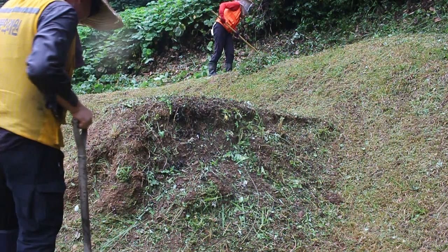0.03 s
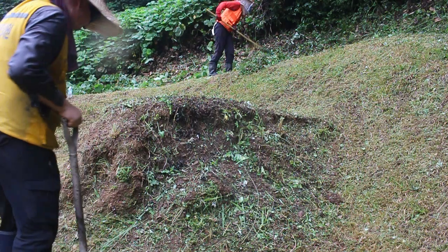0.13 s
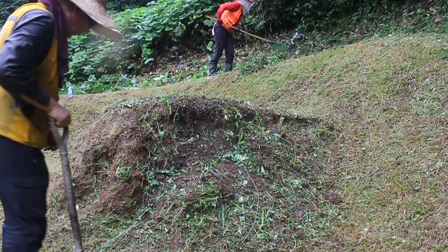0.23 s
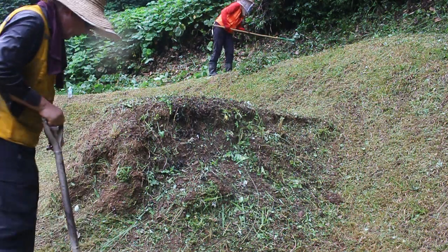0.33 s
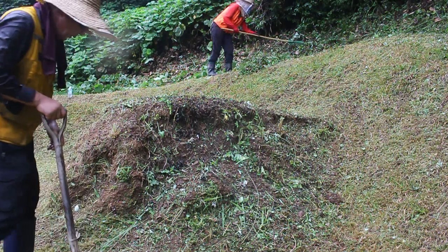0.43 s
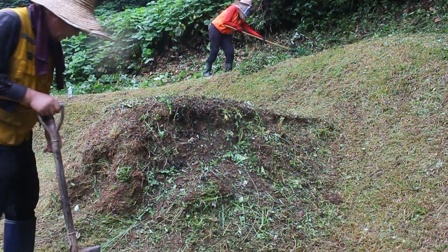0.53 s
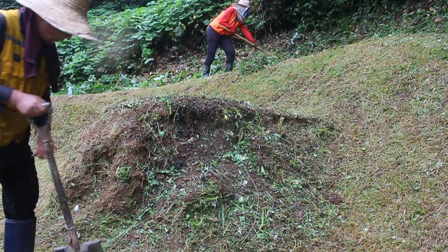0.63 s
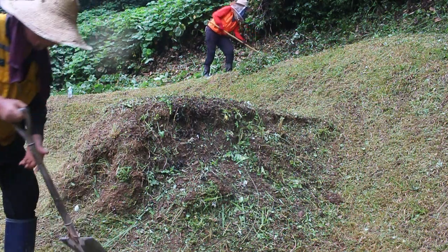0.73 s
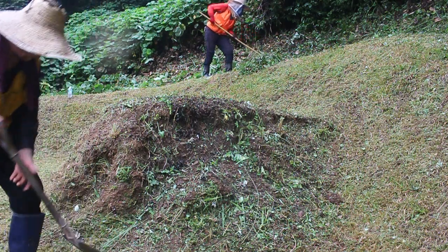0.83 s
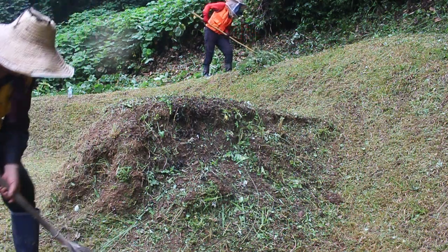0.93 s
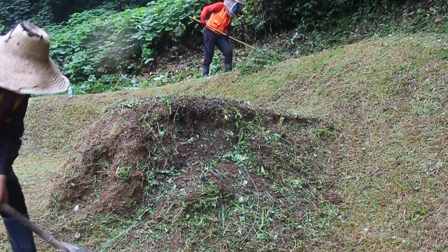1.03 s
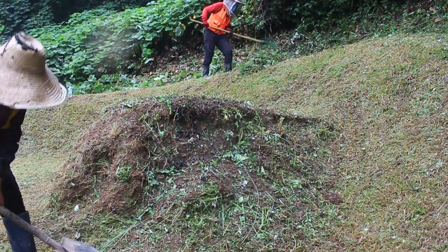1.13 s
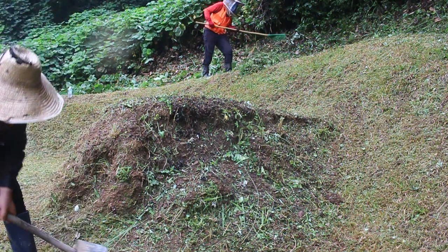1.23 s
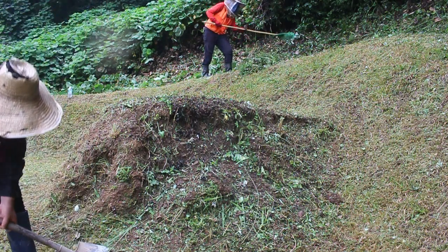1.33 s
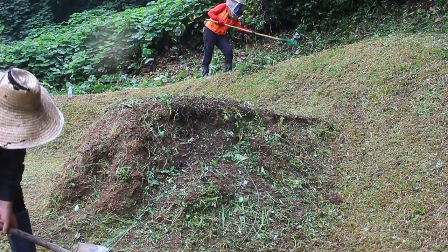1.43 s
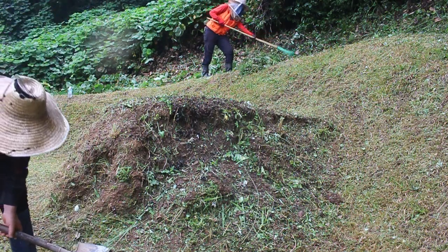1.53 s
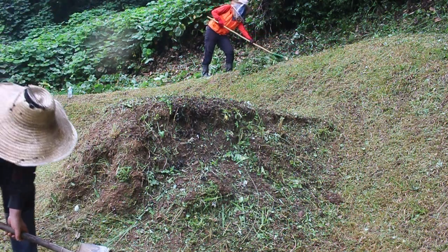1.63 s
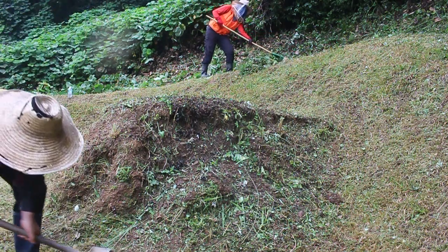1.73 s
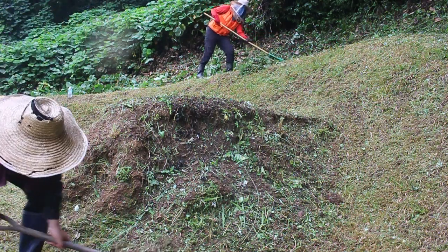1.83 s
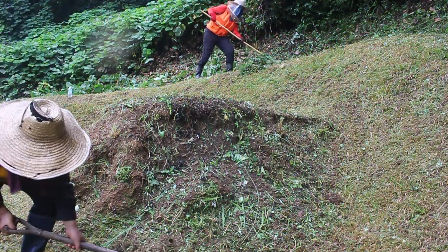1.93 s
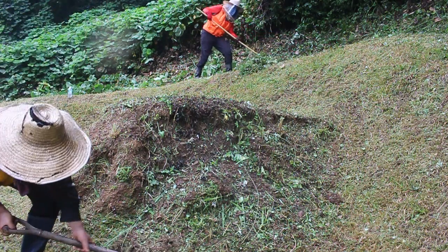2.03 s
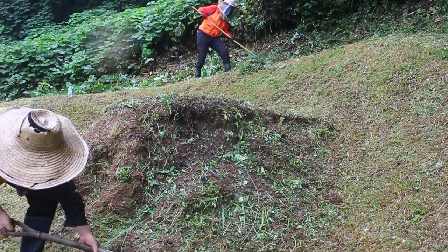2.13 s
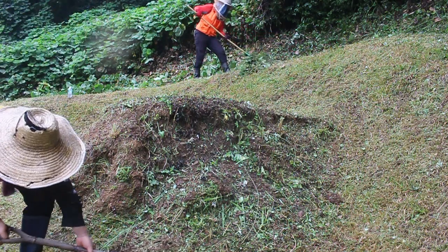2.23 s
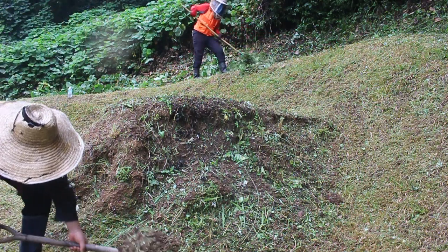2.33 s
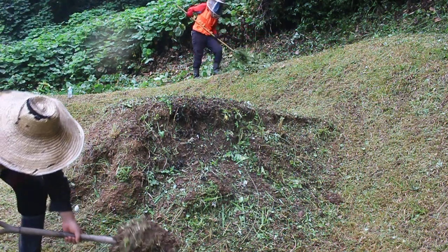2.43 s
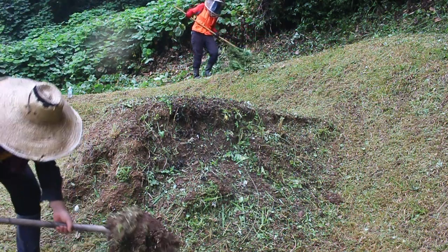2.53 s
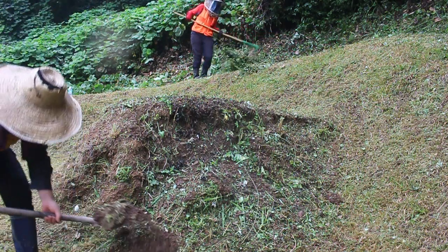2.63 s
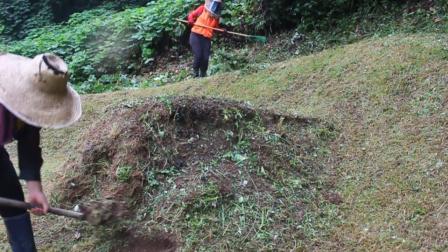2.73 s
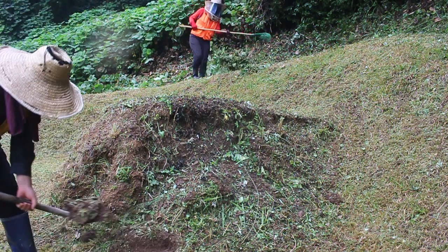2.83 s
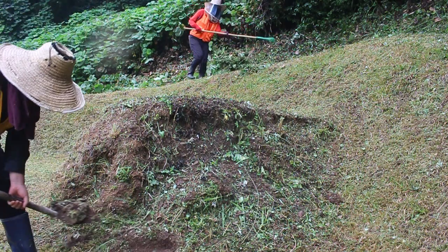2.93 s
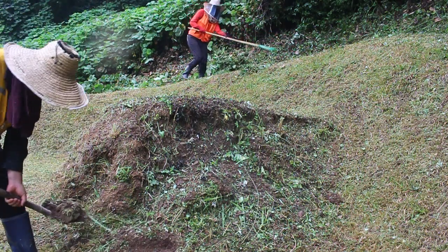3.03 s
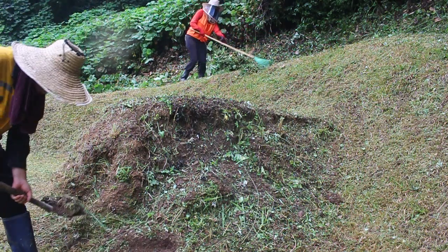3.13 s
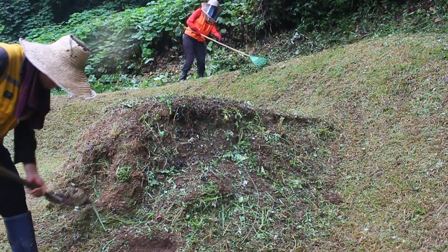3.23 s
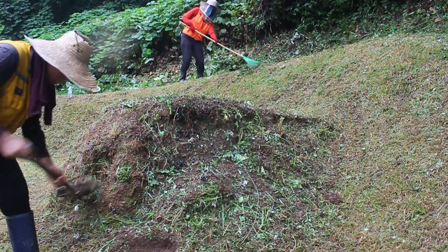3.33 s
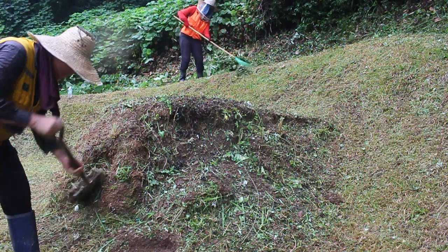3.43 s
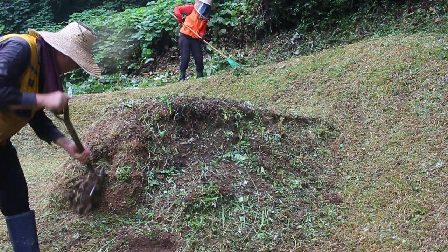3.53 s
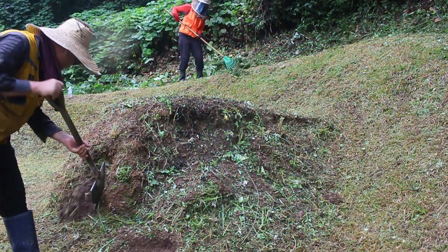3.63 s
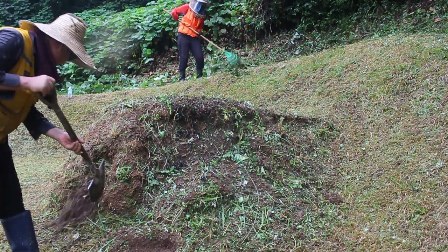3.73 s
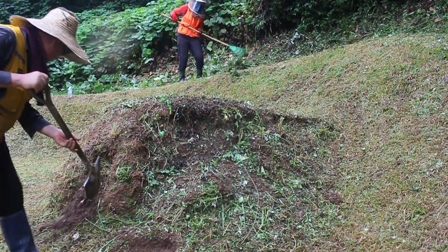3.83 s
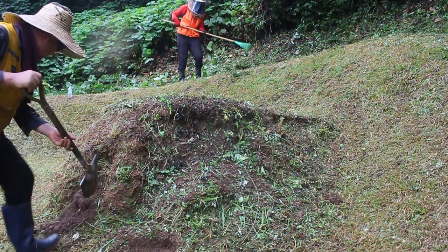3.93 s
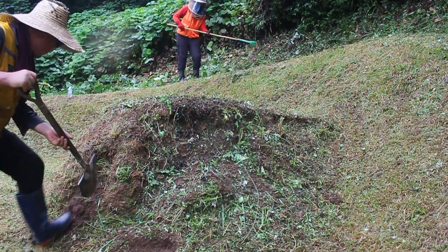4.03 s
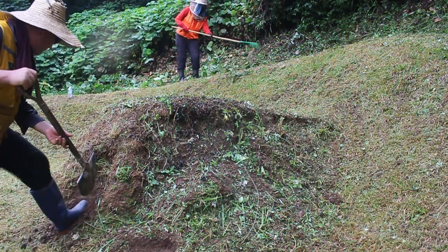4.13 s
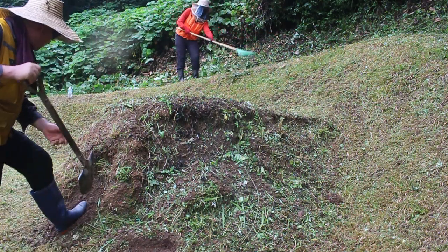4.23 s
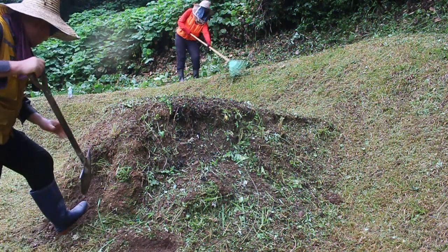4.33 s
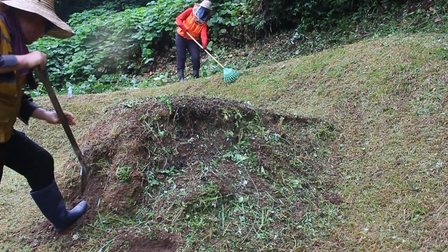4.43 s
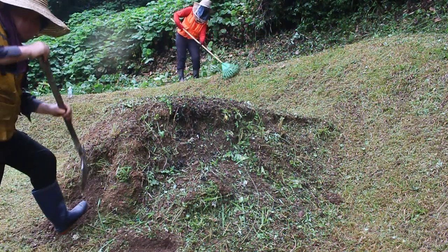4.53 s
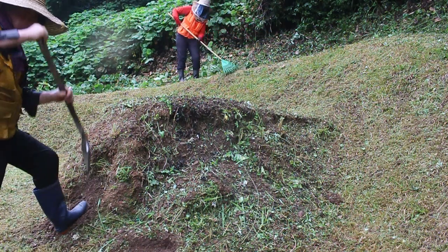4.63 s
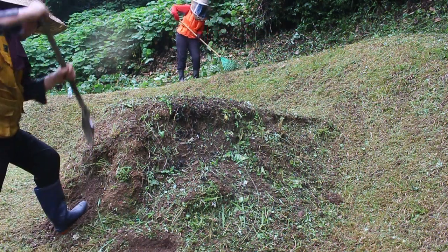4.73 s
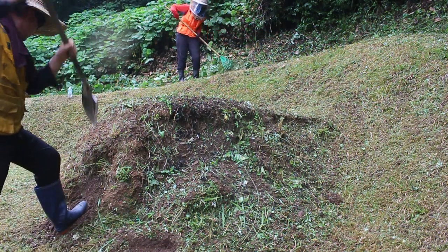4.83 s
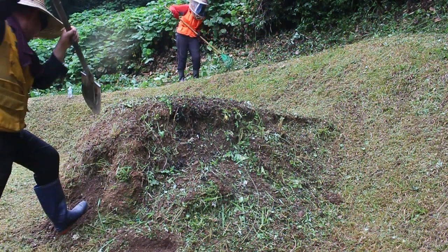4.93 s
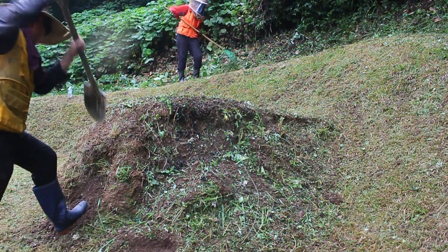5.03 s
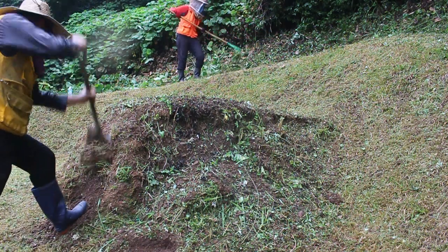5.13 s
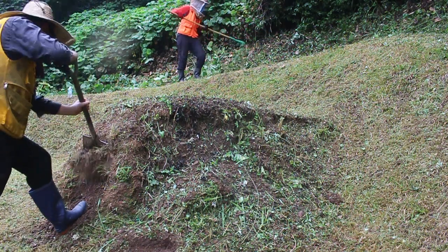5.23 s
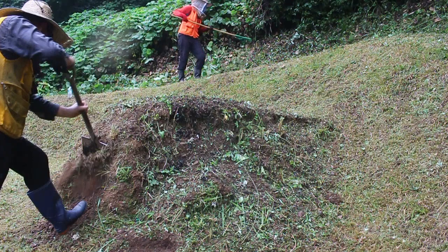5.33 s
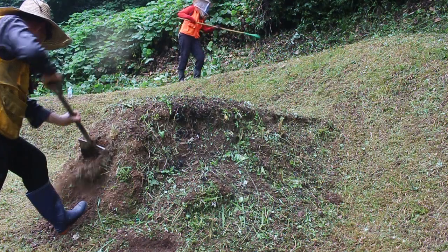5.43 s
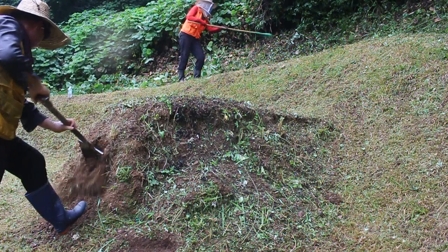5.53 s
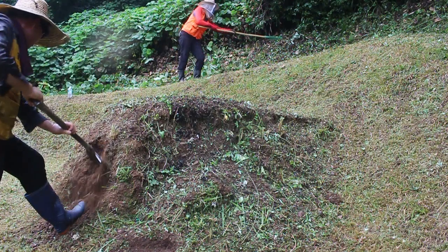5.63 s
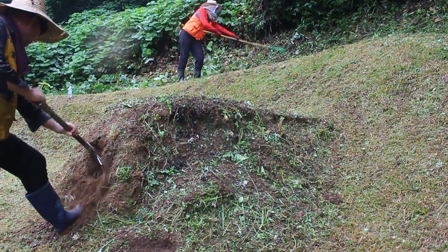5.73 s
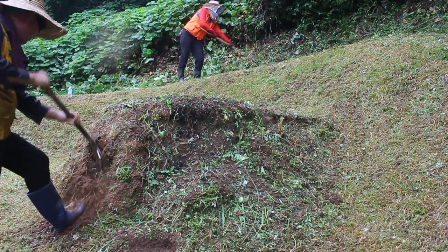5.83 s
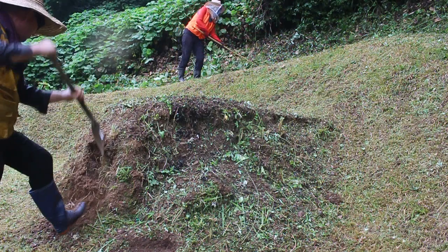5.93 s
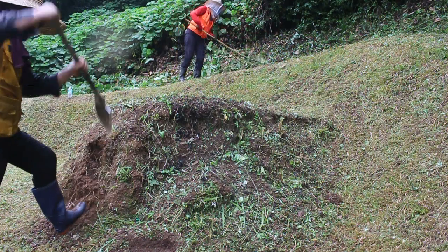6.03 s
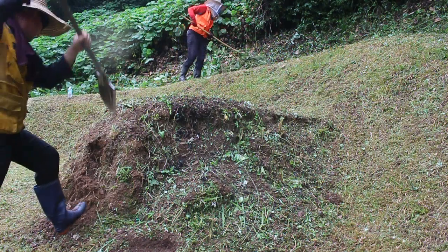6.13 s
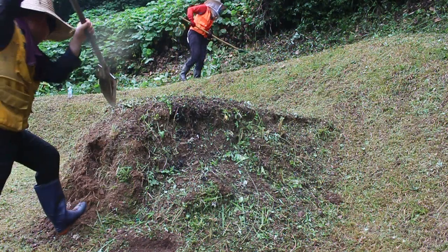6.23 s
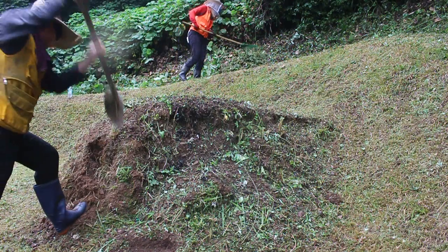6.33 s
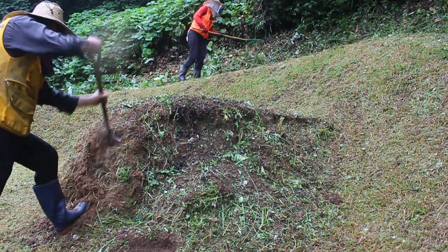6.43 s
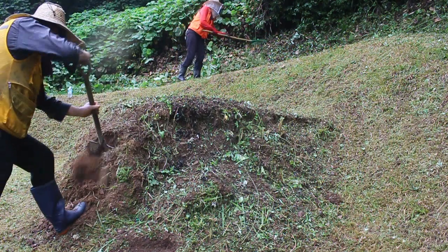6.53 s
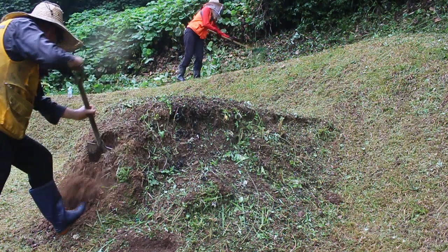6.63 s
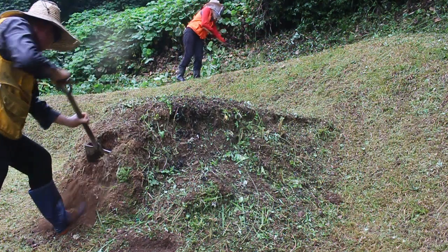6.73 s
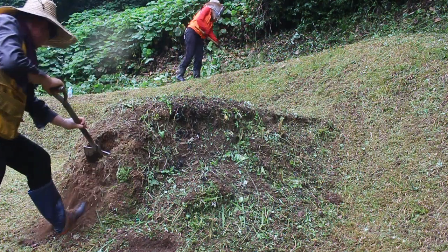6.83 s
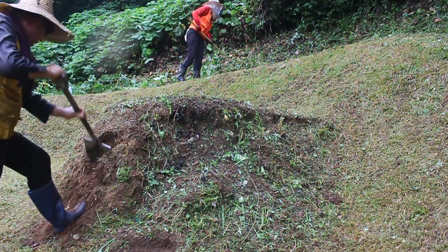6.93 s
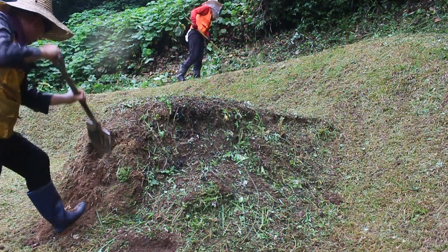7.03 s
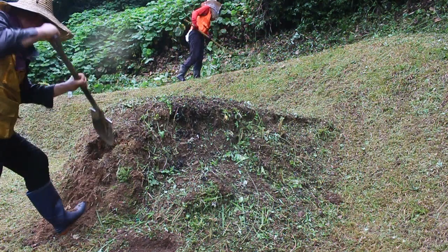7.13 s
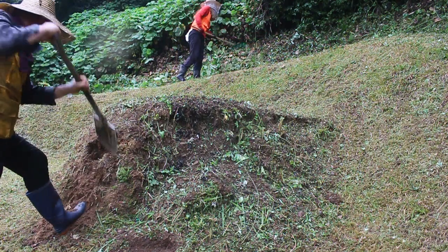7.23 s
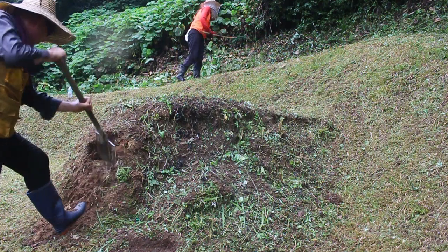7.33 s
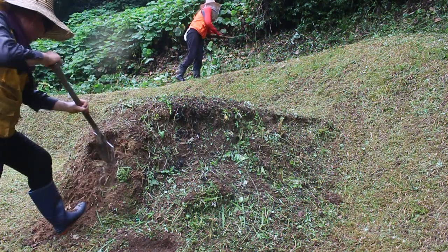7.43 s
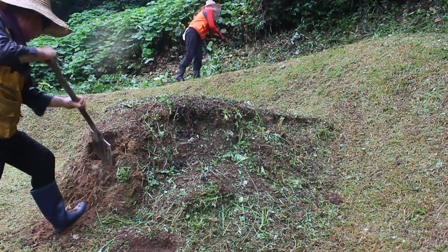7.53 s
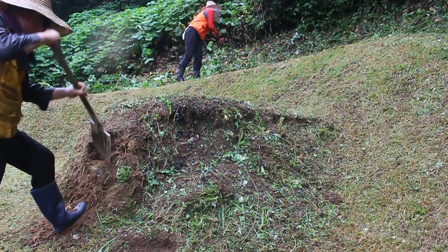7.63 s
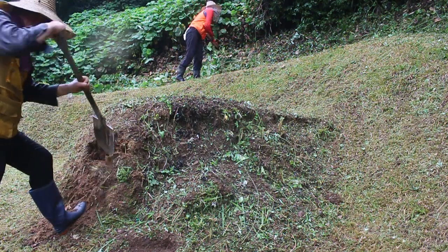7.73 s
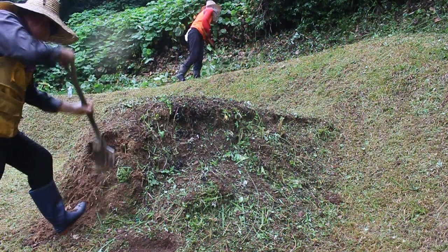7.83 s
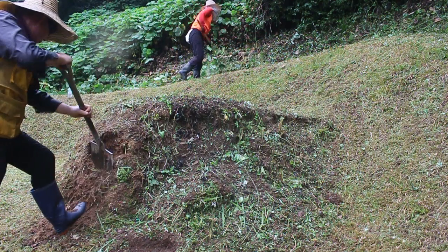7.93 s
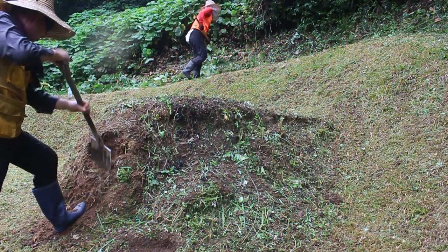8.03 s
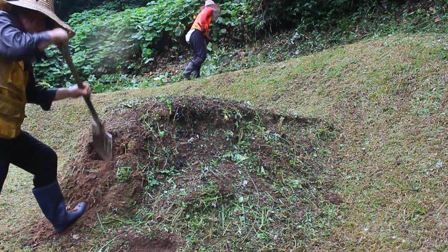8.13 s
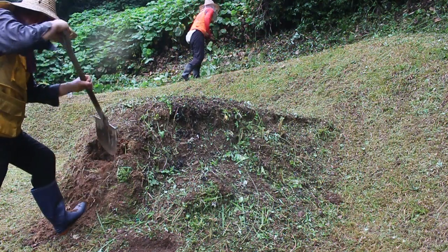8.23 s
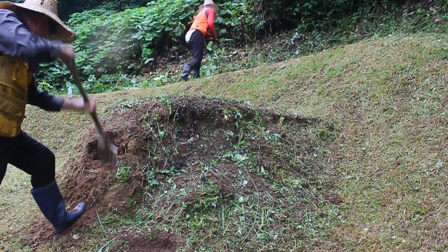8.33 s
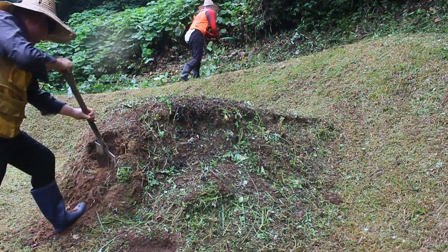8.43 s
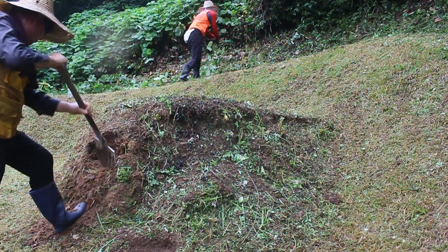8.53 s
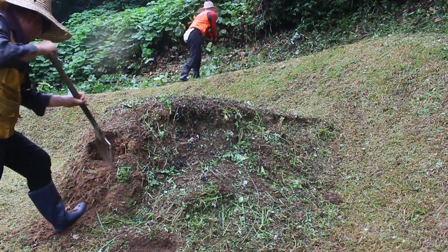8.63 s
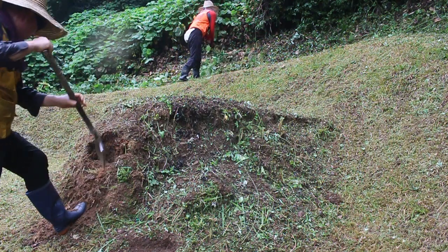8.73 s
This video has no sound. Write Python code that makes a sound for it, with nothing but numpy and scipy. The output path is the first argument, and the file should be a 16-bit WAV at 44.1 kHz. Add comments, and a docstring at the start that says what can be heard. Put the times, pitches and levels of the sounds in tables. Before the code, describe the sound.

Close crunching thrusts and rasps of a shovel in stony earth, with falling clods, one sharp knock and a soft cicada drone.

```python
"""On a grassy slope, a long-handled steel shovel works a heap of stony soil, close to one microphone.
Grit rasps along the blade while the soil muffles it; once free, the steel rings. Stones click, the
blade knocks hard on a buried one, clods thud down and loose earth patters on dry grass.
An insect flies by on humming wings, and cicadas drone in the trees behind, over a soft outdoor hush."""
import sys
import numpy as np
from scipy import signal
from scipy.fft import rfft, irfft
from scipy.io import wavfile
from scipy.ndimage import uniform_filter1d

SR = 44100
rng = np.random.default_rng(int(sys.argv[2]) if len(sys.argv) > 2 else 0)


def transcribe(signal):
    """Save signal, clipped to [-1, 1], as a 16-bit WAV file at the path in sys.argv[1]."""
    frames = np.atleast_2d(signal).T
    limited = np.clip(frames, -1, 1)
    pcm = np.round(limited * 32767).astype(np.int16)
    wavfile.write(sys.argv[1], SR, pcm)


N = 388080
TIME = np.arange(N) / SR

# The blade is jabbed in, bites and slides to a stop. Tilt brightens, body adds bass, f is a favoured pitch.
# t/s, level/dB, rise/s, slide/s, tilt/(dB per octave), body/dB, f/Hz
THRUSTS = [(.944, -34.5, 0.0026, 0.043, -1.5, -14, 3320), (3.453, -32, .005, 0.11, -2, 1, 1200),
           (3.540, -32.5, 0.0017, 0.04, -4.5, -17, 1600), (3.687, -33.5, 0.0044, 0.084, 2, -1, 3300),
           (4.461, -38.5, .0015, .05, 0, 4, 2150), (5.149, -11.5, 0.0023, 0.081, 0, -5, 2630),
           (5.851, -37.5, 0.0049, 0.11, 3, 10, 2750), (6.415, -13, 0.0089, .13, -.5, -3.5, 1140),
           (7.301, -32, 0.0076, 0.093, 6.5, 15, 3580)]
# The blade is drawn through soil: t/s, level/dB, rise/s, fall/s, tilt/(dB per octave), body/dB, f/Hz
DRAGS = [(1.06, -42.5, 0.061, 0.089, 2, 6, 1340), (1.216, -27.5, 0.058, 0.092, 1.5, 5.5, 1400),
         (1.685, -27, .15, 0.14, 1.1, 3, 1720), (3.45, -39, .15, .14, 2, -5, 1610),
         (5.58, -39.5, 0.049, 0.17, 2.5, 5, 2350), (6.418, -25, 0.029, 0.16, -0.5, -2, 1110),
         (7.699, -42.5, 0.04, 0.058, 2, -14, 2160), (7.845, -33.5, 0.052, 0.05, 2, -1, 1540),
         (8.091, -45, .028, .055, 5.5, -10, 2970), (8.347, -27, .064, 0.049, 2.5, -4, 3020),
         (8.699, -45, 0.053, .1, 1, -25, 2860)]
# The edge catches and grinds over a stone: t/s, level/dB, tilt/(dB per octave), body/dB, f/Hz
CATCHES = [(1.889, -23.5, -4.5, -4, 1760), (3.484, -33, 2, 8, 1230), (3.598, -28, 2, -10, 5170),
           (3.620, -27, 2.5, 8.5, 2950), (5.713, -32.5, 0.9, -1.5, 2300), (6.435, -17.5, -7, -7.5, 2280),
           (6.487, -12, -3, -4, 1150), (7.425, -30.5, -0.5, -1, 2460), (7.881, -28.5, 4.5, 3, 2530),
           (8.391, -23, 1, 1, 3140), (8.413, -18.5, -4.5, -2.5, 630)]
# The tone of grit on steel: f/Hz, level/dB
RASP_TONE = [(40, -25), (100, -11.5), (260, -6), (380, -12), (600, -6.5), (950, -3), (1400, -0.5),
             (2600, 2), (4500, 1.5), (7000, -1), (10000, -3.5), (13000, -12.5), (16000, -24)]
# The pitches the blade boosts while soil muffles it: f/Hz, width/Hz, boost/dB
BURIED_MODES = [(506, 150, 14), (606, 76, 5), (748, 52, 12.5), (1124, 78, 7), (1296, 56, 7.5),
                (1390, 79, 9.5), (1552, 75, 11), (1701, 17, 11.5), (2053, 130, 7), (2283, 73, 7),
                (2757, 52, 7.5), (3000, 17, 11.5), (3360, 160, 5.5), (3725, 180, 5.5), (4160, 18, 11),
                (4970, 27, 7), (5180, 48, 5.5), (5740, 150, 3.5)]
# The free blade's own pitches, or modes (t60 is the time to fade by 60 dB): f/Hz, level/dB, t60/s
FREE_MODES = [(1410, -20, 0.47), (1642, 5, 0.61), (2250, -2, 0.46), (2520, 0.5, 0.61), (2900, -1, 0.34),
              (3350, -2, 0.27), (3640, -4, .16), (4240, -4, 0.17), (4380, 5, 0.22), (4730, -11, .12),
              (5480, -3, 0.13), (8250, -5, .1)]
# Blows that ring the blade: t/s, level/dB, favoured f/Hz, pitch ratio under clinging soil
RING_BLOWS = [(0.0, -46.5, 2470, 1.0), (0.429, -52.5, 1460, 1.0), (.679, -51.5, 1600, .93),
              (1.06, -45, 1340, 0.77), (1.735, -34, 1250, 0.79), (3.545, -39, 1600, 1),
              (3.692, -25.5, 4200, 0.95), (3.698, -36, 1700, 0.97), (5.862, -38, 3100, 0.94),
              (6.497, -37, 1500, 0.94), (8.424, -28.5, 1580, 0.92), (8.590, -42.5, 2200, 0.94)]
# The ground thumping under the buried stone: f/Hz, level/dB, t60/s
GROUND_MODES = [(76, -36, 0.26), (142, -26.5, .09), (182, -27, 0.088), (278, -31, 0.084), (883, -25, 0.048)]
# Larger stones clicking on the blade and each other: t/s, level/dB, f/Hz, t60/s
STONE_HITS = [(.193, -23.5, 2080, 0.06), (.275, -17, 1680, 0.02), (1.299, -13.5, 2390, .035),
              (1.722, -17, 2440, .028), (1.855, -7, 1880, 0.029), (2.063, -23.5, 1020, 0.12),
              (2.416, -25, 1610, 0.028), (4.462, -23.5, 2080, 0.019), (5.172, -6, 1700, .011),
              (5.531, -23.5, 2640, .04), (5.559, -27, 2700, .025), (5.937, -22.5, 6000, 0.012),
              (6.459, -6, 1490, .011), (6.539, -15.5, 850, 0.015), (6.784, -26, 1490, 0.064),
              (6.942, -27, 3500, 0.043), (7.5125, -18, 2650, .013), (7.952, -23, 4540, 0.027),
              (8.538, -24, 3570, 0.1), (8.713, -25, 2650, 0.044)]
# Heavy clods and boots landing: t/s, level/dB, f/Hz, t60/s
THUDS = [(.44, -33.5, 583, 0.043), (2.012, -27.5, 626, 0.042), (2.775, -33.5, 715, .1),
         (3.730, -33.5, 357, 0.3), (3.935, -37.5, 328, 0.16), (4.1448, -27, 360, .068),
         (4.158, -26.5, 623, 0.073), (4.243, -32.5, 277, 0.027), (5.366, -25, 423, 0.04),
         (6.778, -33.5, 326, 0.57), (6.940, -36, 250, .07), (8.422, -32.5, 267, .087)]
# Loose earth gathers to a peak and trickles out: peak t/s, level/dB, gathering time/s
EARTH_SLIDES = [(.30, -41, .145), (.73, -51.5, .12), (1.14, -43.5, .18), (1.88, -30, .075),
                (2.16, -42, .11), (2.91, -37.5, .1), (3.58, -40.5, .1), (3.85, -50.5, .16),
                (4.64, -53, .05), (4.86, -49, .09), (5.50, -51.5, .12), (5.95, -53, .14), (6.79, -44, .05),
                (6.99, -41.5, .08), (7.37, -45.5, .1), (7.721, -51, .06), (7.92, -51, .08),
                (8.68, -53, .14)]
# The tone of falling earth: f/Hz, level/dB
EARTH_TONE = [(29, -19), (50, -13), (298, -1.5), (321, -0.5), (746, -4), (842, -7), (927, -3.5), (1620, -2),
              (2210, -1.5), (9640, -14), (14200, -22), (16000, -36)]
# The passing insect: t/s, wingbeat f/Hz, level/dB
FLY_PATH = [(2.1, 238, -69), (2.3, 241, -67), (2.47, 245.6, -54.5), (2.6, 232.8, -59), (2.7, 241, -56.5),
            (2.799, 234.3, -58), (2.95, 232, -72)]
# The cicada chorus: f/Hz, width/Hz, level/dB, pitch swing/Hz
CICADA_BANDS = [(4870, 1040, -63, 15), (6375, 290, -60.5, 36), (6700, 130, -61, 132), (8640, 930, -60, 68)]
# A higher cicada that falls silent: t/s, level/dB
HIGH_CICADA = [(0, -63.5), (2.5, -62.5), (4.8, -63), (5.15, -79), (8.8, -90)]
# The tone of the open air: f/Hz, level/dB
AIR_TONE = [(25, -37), (50, 2.5), (90, 1), (250, 2.5), (500, -1.5), (900, -3), (2000, -4), (4000, -5),
            (7500, -11.5), (10500, -16.5), (14000, -18.5), (16000, -23)]


def scrapes(judder_db=2.5, body_hz=800, accent_db=5, accent_octaves=.15, heavy_db=-24):
    """The blade sticks and slips through grit; each tiny break shakes the muffled steel."""
    out, t = np.zeros(N), TIME[:SR // 2]
    for s, db, push, (tilt, body_db, accent_hz) in strokes(t):
        freedom = max(undb((heavy_db - db) / 2), 1)  # light strokes sound more metallic

        def response(hz):
            """The blade's tone, shaped by the speed and place of contact and the earth moved."""
            slope = tilt * np.log2(np.maximum(hz, body_hz) / body_hz)
            accent = accent_db / (1 + (np.log2(hz / accent_hz) / accent_octaves) ** 2)
            body = body_db / (1 + (hz / body_hz) ** 4)
            return contour(RASP_TONE, hz) + blade_db(hz, freedom) + slope + accent + body

        grains = grit(len(t), per_s=8000, spread_db=3.5)
        judder = undb(judder_db * wander(200, count=len(t)))
        rasp = colour(grains * judder * push, response)
        add(out, s, undb(db) * unit(rasp) * np.sqrt(np.mean(push ** 2)))
    return out


def strokes(t, slide_db=-9.5, slowing_db_per_s=75, catch_rise_s=0.0063):
    """Give the start, level, push over time and tone of every thrust, drag and catch."""
    slide = undb(slide_db - slowing_db_per_s * t)  # the rasp weakens as the blade slows
    for s, db, rise, length, *tone in THRUSTS:
        bite = fade(t, t60=0.12, hold_s=rise + 0.003)
        stop = fade(t, t60=.11, hold_s=length)
        yield s, db, np.minimum(t / rise, 1) * np.maximum(bite, slide) * stop, tone
    for s, db, rise, fall, *tone in DRAGS:
        effort = np.interp(t, [0, rise, rise + fall], [0, 1, 0])
        yield s, db, np.sin(np.pi / 2 * effort) ** 1.27, tone  # the power narrows the swell
    catch = np.minimum(t / catch_rise_s, 1) * fade(t, t60=0.056, hold_s=catch_rise_s + .0035)
    for s, db, *tone in CATCHES:
        yield s, db, catch, tone


def blade_db(hz, freedom):
    """How much the blade boosts each pitch; freedom grows as less soil presses on the steel."""
    peaks = sum((undb(db) ** 2 - 1) / (1 + (2 * (hz - f) / width) ** 2) for f, width, db in BURIED_MODES)
    return 10 * np.log10(np.maximum(1 + freedom * peaks, .1))


def knock(at_s=7.4331, crack_hz=2000, crack_s=0.00028, give_s=0.0033):
    """The blade meets a buried stone head-on: a sharp crack, a choked shudder, a thump in the ground."""
    t = TIME[:SR // 4]
    late = t - 2 * crack_s
    crack = np.sin(2 * np.pi * crack_hz * late) * np.exp(-(late / crack_s) ** 2)
    modes = sum(undb(db) * np.sin(2 * np.pi * (hz * t + rng.random())) for hz, _, db in BURIED_MODES)
    shudder = unit(band(modes, crack_hz, q=0.42)) * np.clip(late / crack_s, 0, 1) * fade(t, t60=0.017)
    # the stone pins the tip, so the blade's lowest pitches stay silent
    blow = signal.sosfilt(signal.butter(4, 850, "high", fs=SR, output="sos"), crack + 0.36 * shudder)
    thump = sum(undb(db) * np.sin(2 * np.pi * hz * t) * fade(t, t60) for hz, db, t60 in GROUND_MODES)
    out = np.zeros(N)
    add(out, at_s, blow / np.abs(blow).max())
    add(out, at_s, thump * np.minimum(t / give_s, 1))  # the soil takes a moment to give way
    return out


def rings(soil_damping=9, reach_octaves=.33):
    """Where a blow lands picks which pitches ring; clinging soil lowers and shortens them."""
    out, t = np.zeros(N), TIME[:SR]
    hz, mode_db, t60 = np.transpose(FREE_MODES)
    for s, db, centre_hz, pitch_ratio in RING_BLOWS:
        gains = undb(mode_db) / (1 + (np.log2(hz / centre_hz) / reach_octaves) ** 2)
        damped_t60 = t60[:, None] / (1 + soil_damping * abs(1 - pitch_ratio))
        modes = np.sin(2 * np.pi * pitch_ratio * hz[:, None] * t) * fade(t, damped_t60)
        add(out, s, undb(db) * gains @ modes / np.linalg.norm(gains))
    return out


def stones(pebbles):
    """Stones and pebbles click, and draw a brief clink from the blade."""
    clicks = impacts([*STONE_HITS, *pebbles], q=0.88, crumble=0.64, grains_per_s=8000, crisp=0.64)
    return colour(clicks, lambda hz: blade_db(hz, freedom=0.3) - 3)


def clods(lumps):
    """Clods, boots and small lumps of soil land with dull thuds."""
    return impacts([*THUDS, *lumps], q=0.95, crumble=0.13, grains_per_s=1500, crisp=0.76)


def impacts(rows, q, crumble, grains_per_s, crisp):
    """Each hit is one tap and a crumbling tail around a rough pitch, with a little crisp edge."""
    out, t = np.zeros(N), TIME[:SR // 2]
    for s, db, hz, t60 in rows:
        force = crumble * grit(len(t), grains_per_s, spread_db=5.5) * fade(t, t60)
        force[0] += 1  # the first contact
        bright = band(force, hz, q)
        hit = band(bright, hz, q) + crisp * bright
        add(out, s, undb(db) * hit / np.abs(hit).max())
    return out


def loose_earth(moving, patter_db=2.0, split_hz=1500):
    """Coarse crumbs patter low; fine grains and dry stalks rustle high."""
    crumbs = grit(N, per_s=1200, spread_db=3.5)
    grains = grit(N, per_s=3000, spread_db=1.0)
    patter = colour(crumbs, lambda hz: contour(EARTH_TONE, hz) - 10 * np.log10(1 + (hz / split_hz) ** 2))
    rustle = colour(grains, lambda hz: contour(EARTH_TONE, hz) - 10 * np.log10(1 + (split_hz / hz) ** 2))
    return unit((patter + rustle) * undb(patter_db * wander(70))) * moving


def earth_flow(trickle_ratio=1.3):
    """How much loose earth is moving; each slide trickles out more slowly than it gathers."""
    power = np.zeros(N)
    for s, db, gather in EARTH_SLIDES:
        from_peak = np.maximum(s - TIME, (TIME - s) / trickle_ratio)
        power += (undb(db) * np.exp(-from_peak / gather)) ** 2
    return np.sqrt(power)


def debris(moving, over_db, hz, t60, scatter_db, scatter_octaves, count):
    """Small pieces tumble more often and harder as more earth moves. Rows: t/s, level/dB, f/Hz, t60/s."""
    when, size, pitch = rng.uniform(-1, 1, (count, 3)).T
    fallen = np.cumsum(np.minimum(moving, undb(-42.5)))  # above this flow, harder but no more often
    share = (np.arange(count) + (when + 1) / 2) / count
    s = np.interp(share, fallen / fallen[-1], TIME)
    db = 20 * np.log10(np.interp(s, TIME, moving)) + over_db + scatter_db * size
    return np.transpose([s, db, hz * 2 ** (scatter_octaves * pitch), np.full(count, t60)])


def fly(db_per_octave=-8, waver=0.0084):
    """Beating wings make a faint, wavering hum with four overtones."""
    s, hz, db = np.transpose(FLY_PATH)
    wingbeat_hz = np.interp(TIME, s, hz) * (1 + waver * wander(19))
    phase = 2 * np.pi * np.cumsum(wingbeat_hz) / SR
    hum = sum(undb(db_per_octave * np.log2(k)) * np.sin(k * phase) for k in range(1, 6))
    return unit(hum) * np.interp(TIME, s, undb(db), left=0, right=0)


def cicadas(throb_hz=13.2, throb_db=1.0):
    """The chorus throbs in pitch and swells twice in every throb; one higher voice falls silent."""
    phase = 2 * np.pi * np.cumsum(throb_hz * (1 + .02 * wander(3))) / SR
    swell_db = throb_db * np.sin(2 * phase)
    chorus = sum(buzz(hz + swing * np.sin(phase), width) * undb(db + swell_db + 0.9 * wander(3.92))
                 for hz, width, db, swing in CICADA_BANDS)
    high_db = np.interp(TIME, *np.transpose(HIGH_CICADA))
    return chorus + buzz(9400, width_hz=1900) * undb(high_db)


def buzz(hz, width_hz):
    """Many far cicadas blur into a narrow band of noise around a pitch."""
    noise = rng.standard_normal((2, N))
    blur = signal.sosfilt(signal.butter(2, width_hz / 2, fs=SR, output="sos"), noise)
    tone = np.exp(2j * np.pi * np.cumsum(hz * np.ones(N)) / SR)
    return unit(np.real((blur[0] + 1j * blur[1]) * tone))


def air(hush_db=-52.5, stir_db=-60.5):
    """A soft outdoor hush whose low end stirs."""
    hush = unit(colour(rng.standard_normal(N), lambda hz: contour(AIR_TONE, hz)))
    stir = unit(band(rng.standard_normal(N), 350, q=0.48)) * undb(stir_db + 5.3 * wander(7.1))
    return hush * undb(hush_db + .5 * wander(1.28)) + stir


def grit(count, per_s, spread_db):
    """Sharp little ticks at random moments: many small, a few large."""
    size = undb(spread_db * np.minimum(rng.exponential(size=count), 4))
    return unit(rng.choice([-1, 1], count) * size * (rng.random(count) < per_s / SR))


def wander(per_s, count=N):
    """A smooth random drift, typically about 1 away from zero."""
    k = max(int(SR / per_s), 2)
    steps = np.repeat(rng.standard_normal(count // k + 1), k)
    return np.sqrt(3 / 2) * uniform_filter1d(steps, k)[:count]


def colour(x, db_of, size=4096):
    """Turn each frequency in x up or down by db_of(hz) decibels."""
    hz = np.maximum(np.fft.rfftfreq(size, 1 / SR), 1)
    cepstrum = irfft(np.log(undb(db_of(hz))))
    # folding this in half makes the filter ring only after a tick, never before
    cepstrum[1:size // 2] *= 2
    cepstrum[size // 2 + 1:] = 0
    return signal.fftconvolve(x, irfft(np.exp(rfft(cepstrum, size))))[:len(x)]


def contour(points, hz):
    """Read the level at hz from a table of f/Hz, level/dB."""
    f, db = np.transpose(points)
    return np.interp(np.log(hz), np.log(f), db)


def band(x, hz, q):
    """Keep the sound near hz; a higher q keeps a narrower band."""
    return signal.lfilter(*signal.iirpeak(min(hz, SR / 3), q, fs=SR), x)


def fade(t, t60, hold_s=0):
    """Stay at 1 for hold_s, then die away by 60 dB every t60 seconds."""
    return np.exp(-np.log(1000) * np.maximum(t - hold_s, 0) / t60)


def undb(db):
    """Turn decibels into a multiplier."""
    return 10 ** (np.asarray(db) / 20)


def unit(x):
    """Scale x to an average power of 1."""
    return x / np.sqrt(np.mean(x ** 2))


def add(out, s, x):
    """Mix x into out, starting at s seconds."""
    i = max(int(s * SR), 0)
    out[i:i + len(x)] += x[:N - i]


def scene():
    """Mix the digging and the background, the same in both channels."""
    moving = earth_flow()
    pebbles = debris(moving, over_db=15, hz=2800, t60=.025, scatter_db=4, scatter_octaves=1.1, count=44)
    lumps = debris(moving, over_db=4, hz=430, t60=0.057, scatter_db=6, scatter_octaves=0.53, count=28)
    digging = stones(pebbles) + clods(lumps) + scrapes() + rings() + knock() + loose_earth(moving)
    mono = digging + cicadas() + fly() + air()
    return np.array([mono, mono])


def record(dry, low_cut_hz=42, top_hz=15800):
    """The microphone drops the deepest bass; peaks are clipped and the highest treble is cut off."""
    lean = signal.sosfilt(signal.butter(1, low_cut_hz, "high", fs=SR, output="sos"), dry)
    return signal.sosfilt(signal.ellip(10, .1, 80, top_hz, fs=SR, output="sos"), np.clip(lean, -1, 1))


dry = scene()
out = record(dry)
transcribe(out)
```